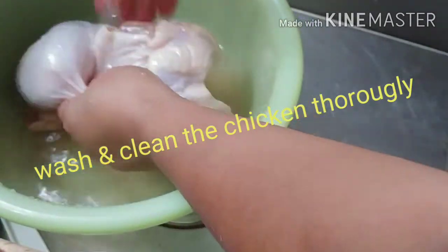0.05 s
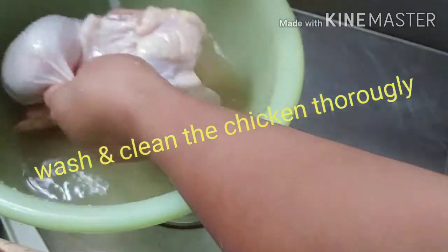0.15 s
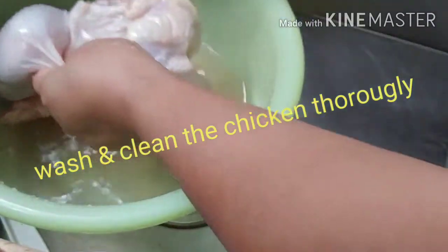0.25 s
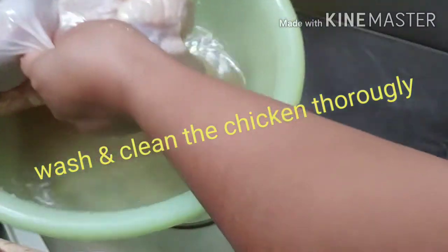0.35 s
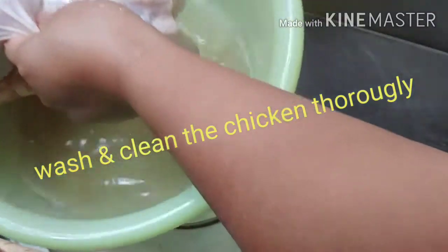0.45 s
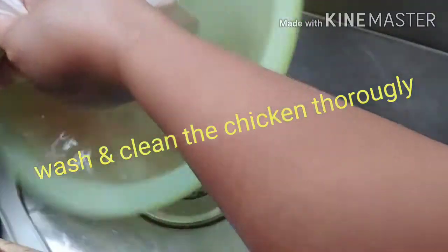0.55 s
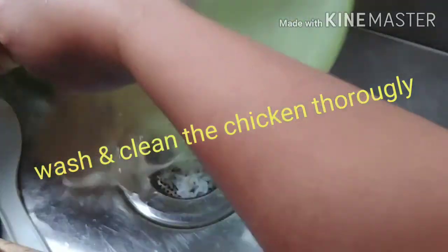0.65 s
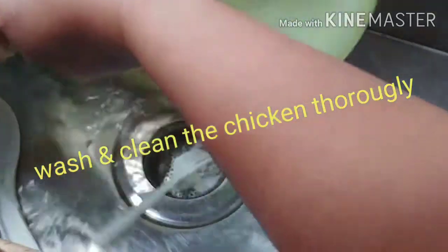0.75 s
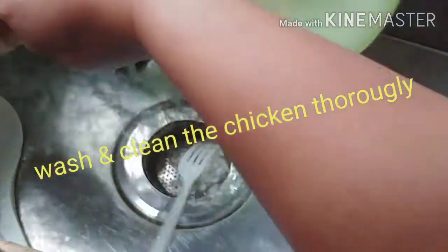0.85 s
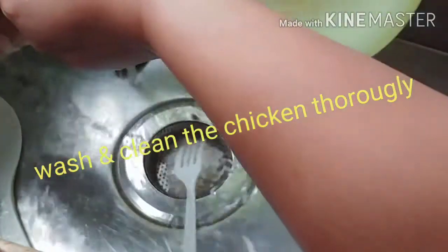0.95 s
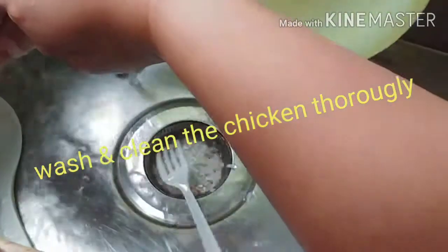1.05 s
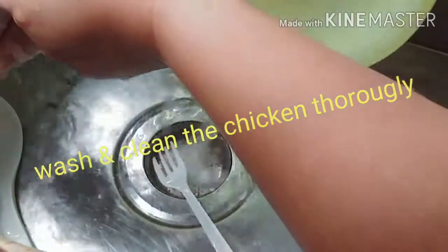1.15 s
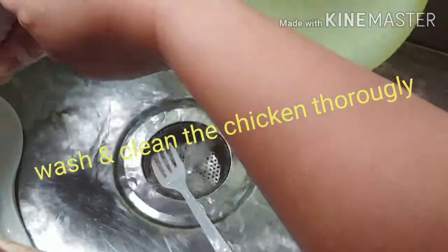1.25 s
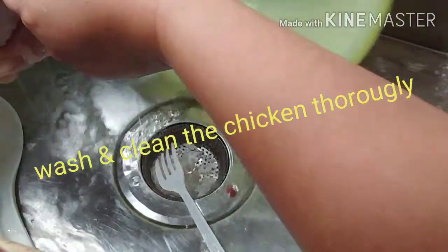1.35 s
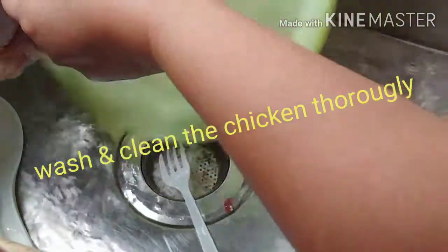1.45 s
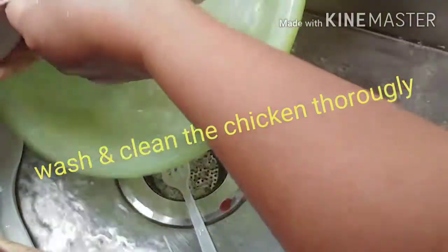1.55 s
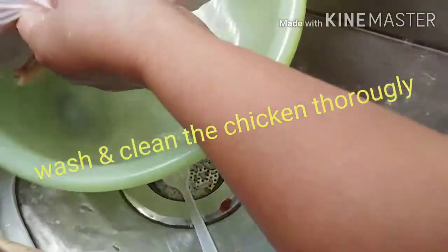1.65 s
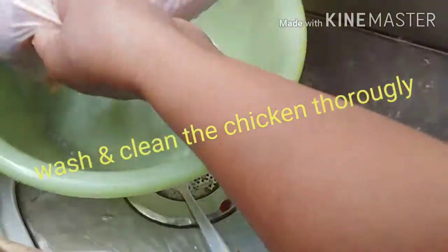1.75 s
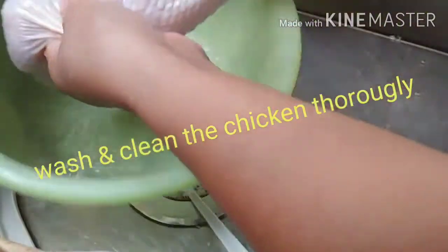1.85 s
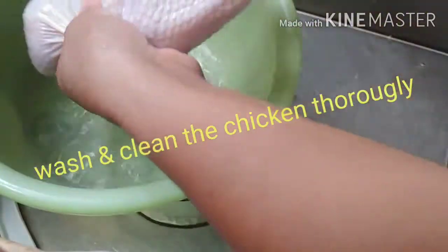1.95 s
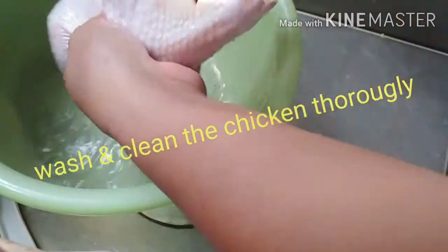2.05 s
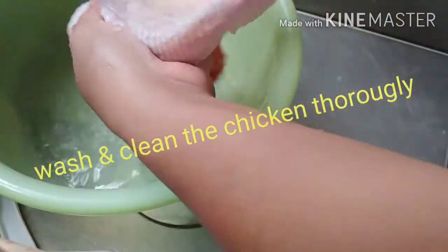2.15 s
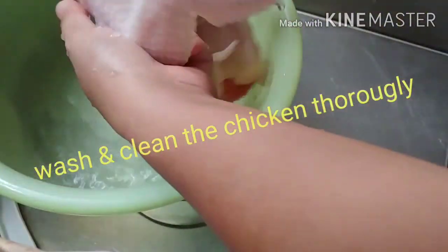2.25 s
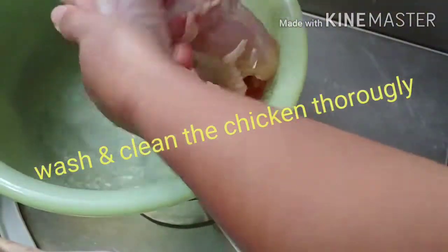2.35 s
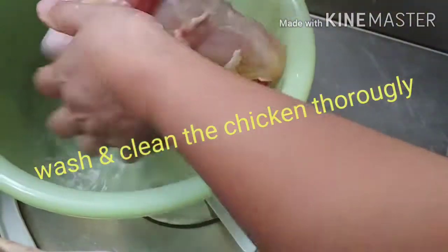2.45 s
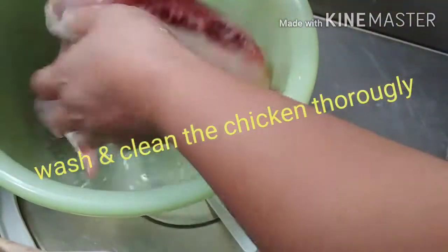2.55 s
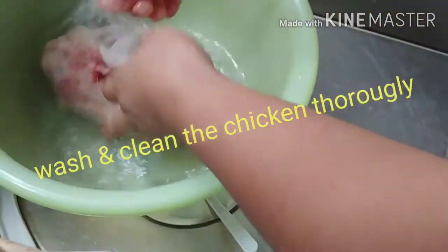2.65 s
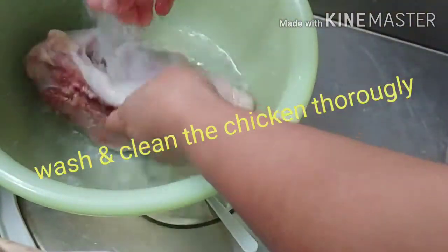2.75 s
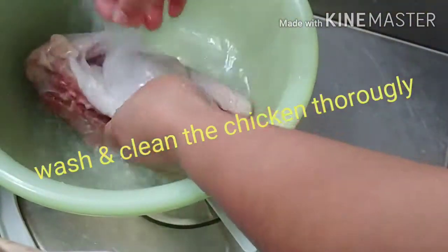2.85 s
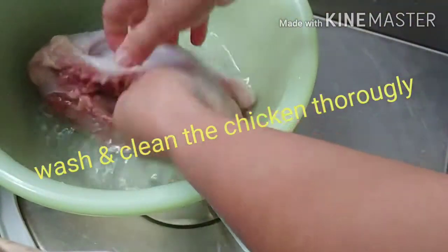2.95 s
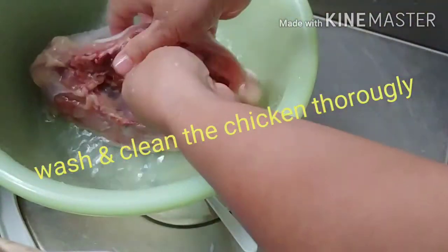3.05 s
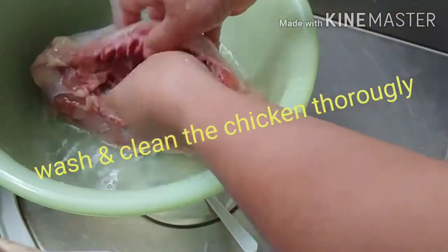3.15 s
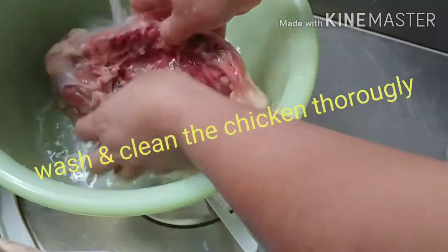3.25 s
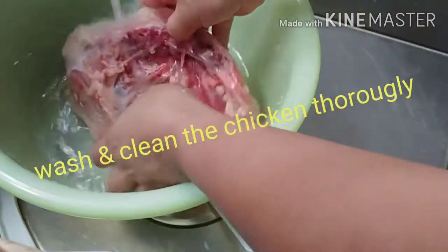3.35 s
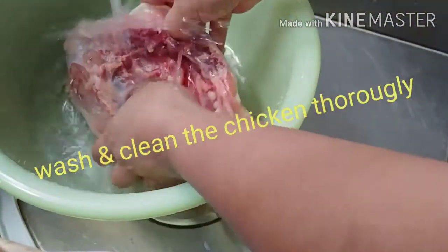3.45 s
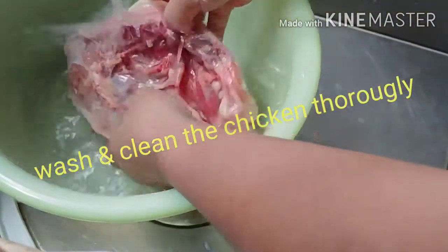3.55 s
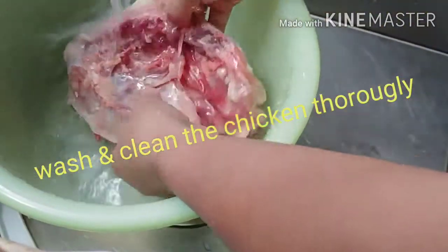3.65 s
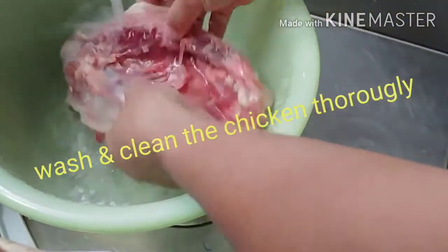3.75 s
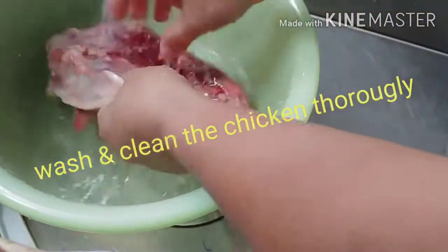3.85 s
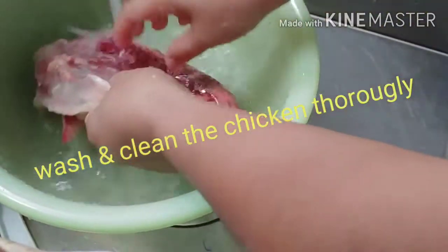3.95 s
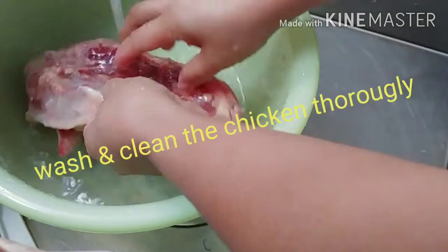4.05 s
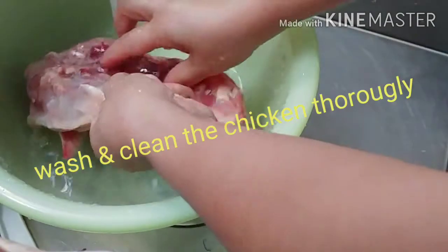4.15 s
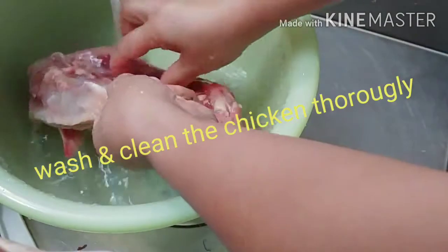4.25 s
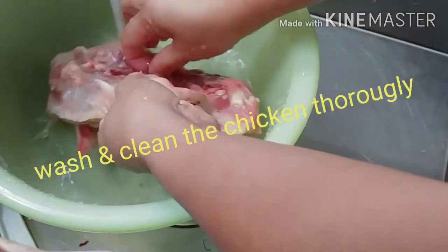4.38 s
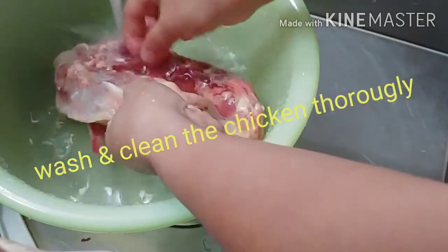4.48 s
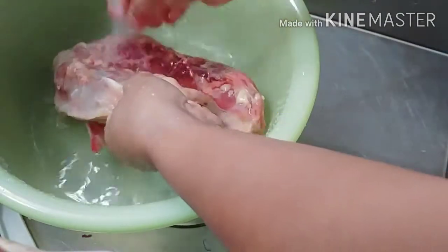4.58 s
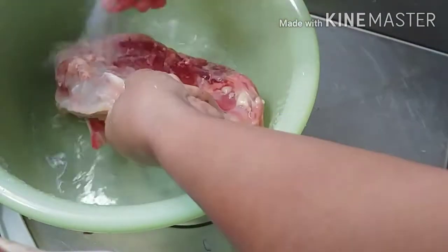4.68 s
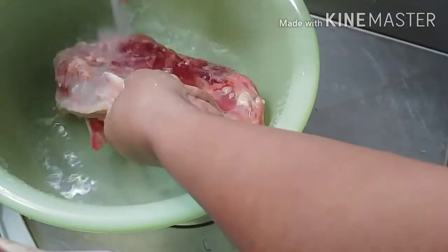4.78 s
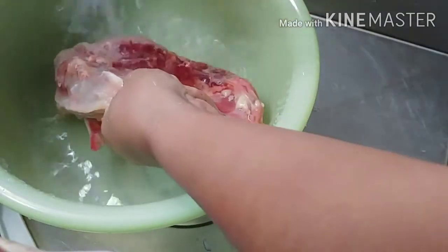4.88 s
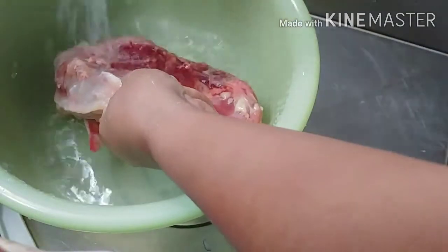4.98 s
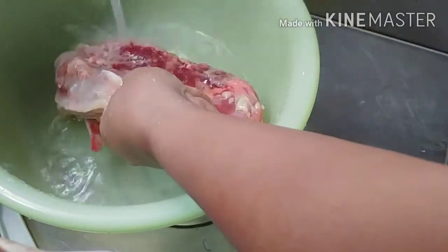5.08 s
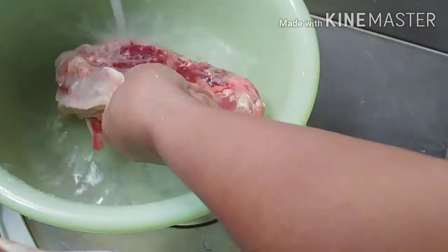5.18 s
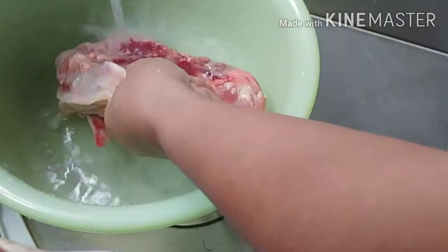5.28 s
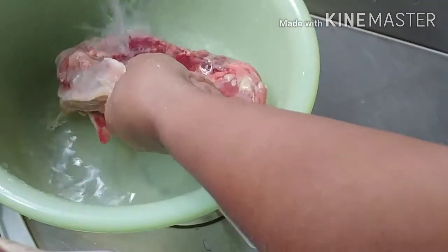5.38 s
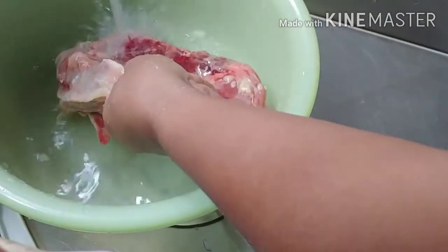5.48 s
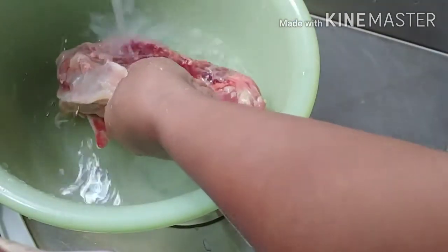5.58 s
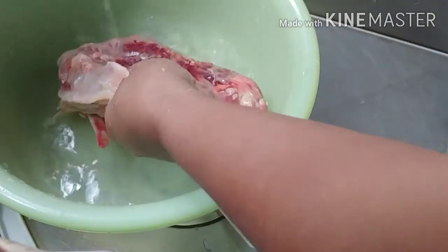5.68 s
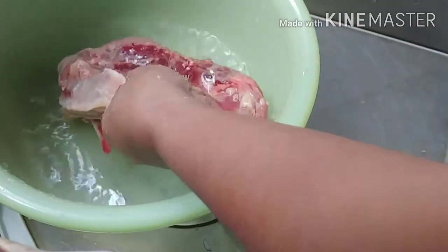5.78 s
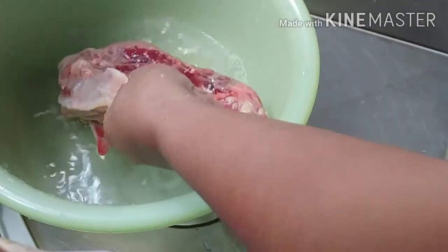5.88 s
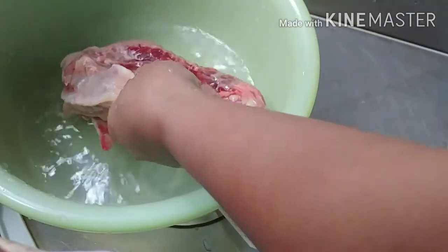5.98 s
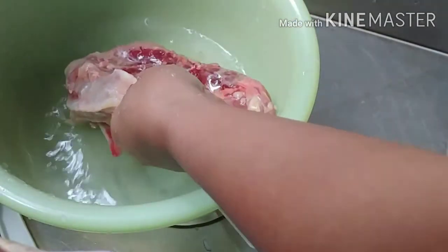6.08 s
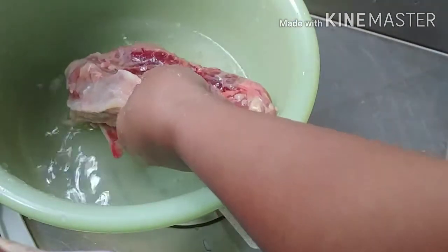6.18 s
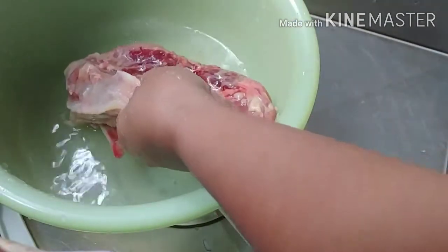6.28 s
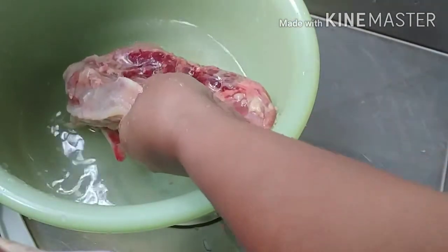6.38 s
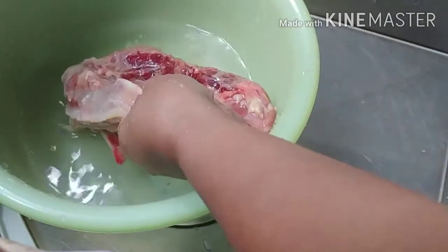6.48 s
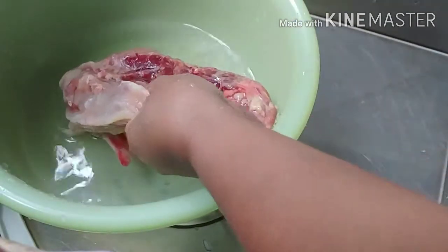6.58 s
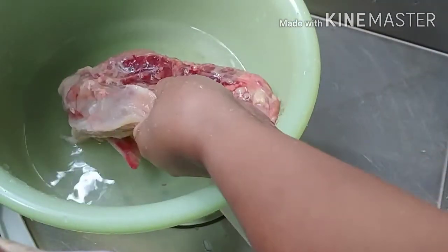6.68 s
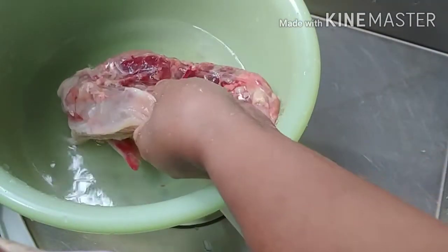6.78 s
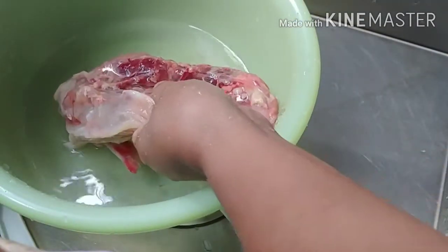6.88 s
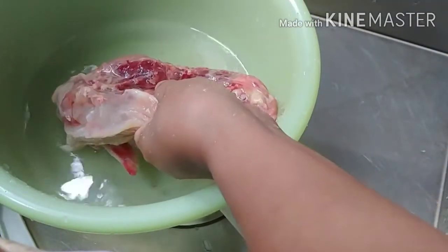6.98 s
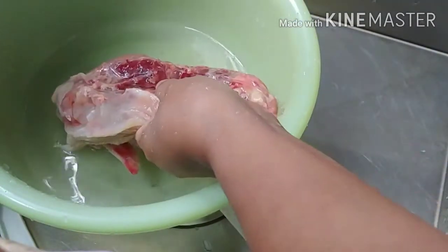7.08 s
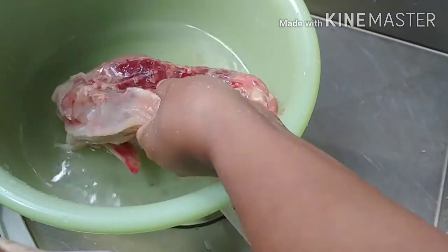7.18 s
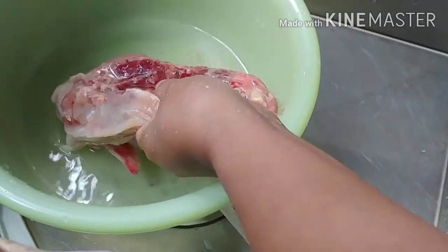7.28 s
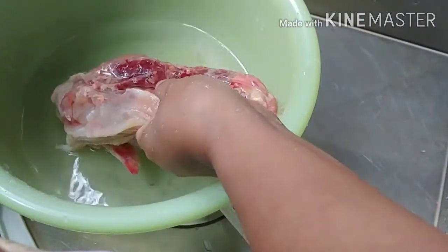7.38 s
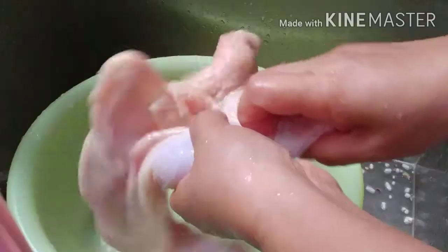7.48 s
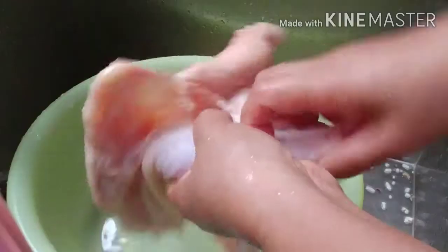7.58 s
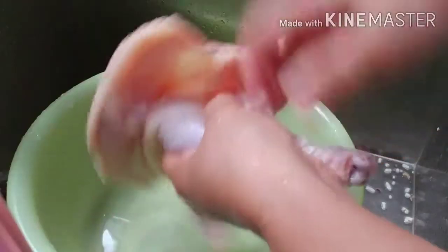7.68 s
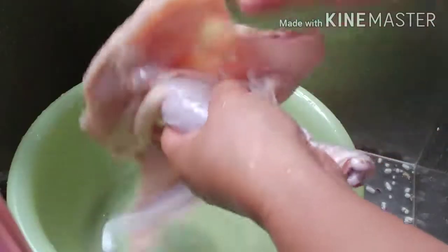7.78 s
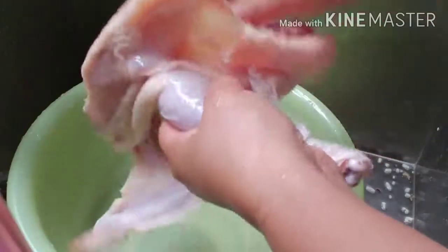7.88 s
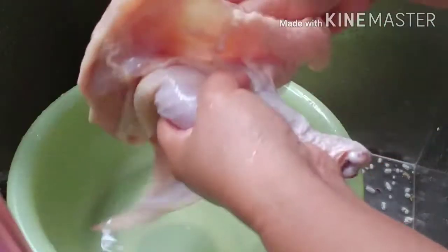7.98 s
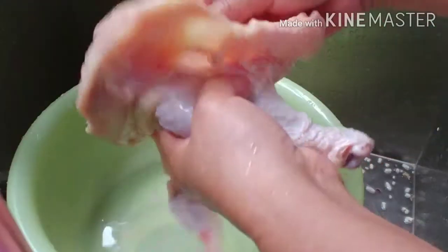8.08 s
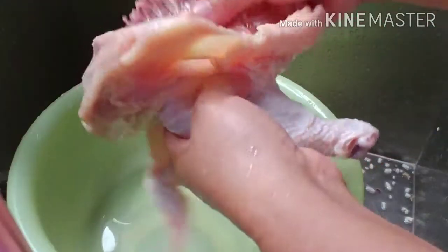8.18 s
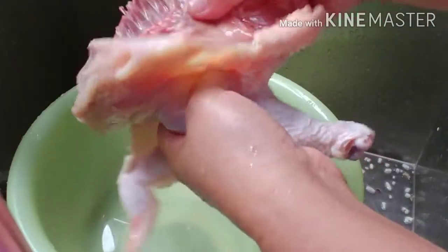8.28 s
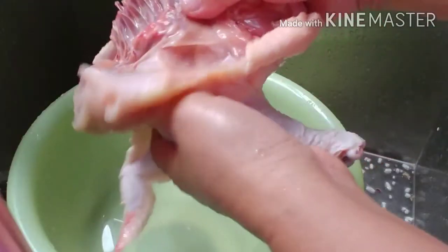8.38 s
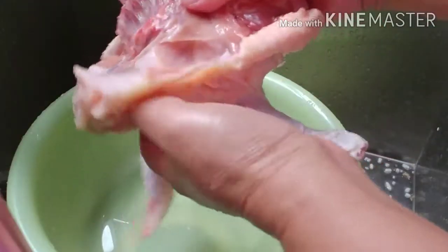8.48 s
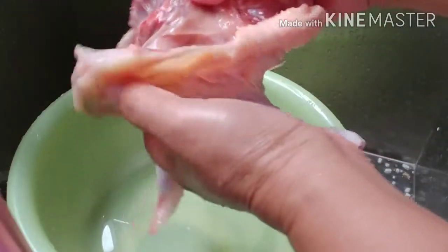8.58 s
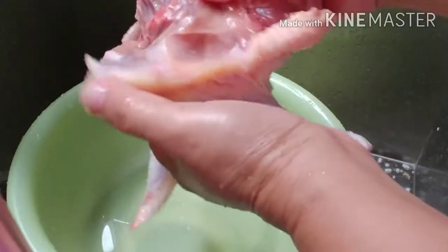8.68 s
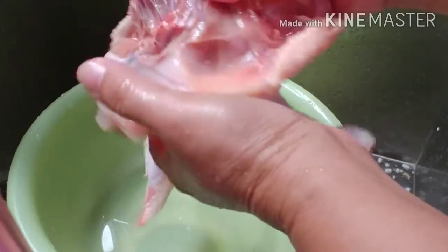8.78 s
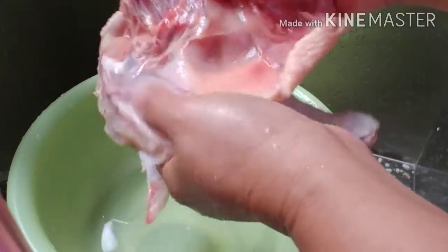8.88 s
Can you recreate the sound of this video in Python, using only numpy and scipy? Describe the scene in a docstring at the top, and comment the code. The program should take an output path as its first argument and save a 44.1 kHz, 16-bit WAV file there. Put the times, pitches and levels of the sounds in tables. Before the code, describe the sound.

Tap water splashes over meat into a plastic basin with bumps and clinks, then shuts off and drips.

```python
"""Tap water splashes over meat and hands into a plastic basin that stands in a steel sink.
Early on the basin is tipped out and bumps the sink, steel clinks, and run-off drums on the basin floor.
At 5.4 s the tap closes and spits once more; water goes on dripping onto the basin.
At 7 s the sound is cut to silence. Half a second later it returns as a quiet kitchen with soft drips."""
import sys
import numpy as np
from scipy import signal
from scipy.io import wavfile

SR = 44100
rng = np.random.default_rng(int(sys.argv[2]) if len(sys.argv) > 2 else 0)


def dump_mix(stems):
    """Bounce the given channels to the path in sys.argv[1] as a 16-bit WAV at rate SR."""
    frames = np.atleast_2d(stems).T  # one column per channel
    limited = np.clip(frames, -1, 1)  # hard clip at full scale
    pcm = np.round(limited * 32767).astype(np.int16)
    wavfile.write(sys.argv[1], SR, pcm)


N = 393794
CUT_S, BACK_S = 7.024, 7.584   # silence between these moments


def from_db(db):
    """Turn decibels into a number to multiply by."""
    return 10 ** (np.asarray(db) / 20)


def rms_one(x):
    """Scale a signal so that its average power is 1."""
    return x / np.sqrt(np.mean(x ** 2) + 1e-20)


def in_time(rows):
    """Join a table's rows with straight lines: one curve for each column after the time."""
    s, *columns = np.transpose(rows)
    return [np.interp(np.arange(N) / SR, s, c) for c in columns]


def at_hz(points, hz):
    """Read a table at any pitch, with octaves evenly spaced."""
    pitches, values = np.transpose(points)
    return np.interp(np.log(hz), np.log(pitches), values)


def drift(rate_hz):
    """A smooth random wobble, about 1 in size."""
    r = np.exp(-40 * np.pi * rate_hz / SR)   # worked out for every 20th sample
    slow = signal.lfilter([1], [1, -2 * r, r * r], rng.standard_normal(N // 20 + 3002))[3000:]
    return np.interp(np.arange(N) / 20, np.arange(len(slow)), rms_one(slow))


def soften(force, hz):
    """Dull the treble above hz, as when water lands softly."""
    r = np.exp(-2 * np.pi * hz / SR)
    return signal.lfilter([(1 - r) ** 2], [1, -2 * r, r * r], force + 1e-18)


def above(x, hz):
    """Cut the bass below hz: a small panel gives off little below its lowest note."""
    return signal.sosfilt(signal.butter(3, hz, "high", fs=SR, output="sos"), x)


def resonate(x, hz, width_hz):
    """Make a signal ring at one pitch; a smaller width rings longer."""
    r, w = np.exp(-np.pi * width_hz / SR), 2 * np.pi * hz / SR
    return signal.lfilter([0, np.sin(w)], [1, -2 * r * np.cos(w), r * r], x + 1e-18)


# How alike the two sides sound. Each row: pitch in Hz, likeness from 0 to 1.
LIKENESS = [(60, .95), (130, .98), (290, .9), (640, .5), (1400, .15), (3000, 0), (15000, 0)]
# Balance. Each row: pitch in Hz, level of the left side over the right in dB.
LEFT_OVER_RIGHT = [(60, -6), (200, -6), (600, -15.5), (1300, -9), (2400, -2), (4400, -4), (6500, -0.5),
                   (8000, -9), (12000, -4)]
def place(mid, side, hz):
    """Two microphone openings hear a band alike in the bass and unrelated in the treble."""
    alike, tilt = at_hz(LIKENESS, hz), at_hz(LEFT_OVER_RIGHT, hz) / 2
    pair = np.sqrt(1 + alike) * mid + np.sqrt(1 - alike) * side * [[1], [-1]]
    return pair * from_db([[tilt], [-tilt]])


def body(notes, force):
    """Two force signals ring all the notes of one object, swapping places from note to note."""
    return sum(from_db(db) * place(*resonate(force[::(-1) ** k], hz, width), hz)
               for k, (hz, width, db) in enumerate(notes))


def coloured(spectrum, sources, flicker_db, flicker_hz, bands, tilt_db=0):
    """Shape noise band by band, each with its own level and flicker; the sources take turns."""
    out, edges = 0, np.geomspace(spectrum[0][0], spectrum[-1][0], bands + 1)
    for k, (low, high) in enumerate(zip(edges, edges[1:])):
        band_filter = signal.butter(2, [low, high], "band", fs=SR, output="sos")
        band = signal.sosfilt(band_filter, sources[k % len(sources)])
        hz = np.sqrt(low * high)
        flicker = flicker_db * (drift(flicker_hz) + .7 * drift(flicker_hz / 8))
        level_db = at_hz(spectrum, hz) + flicker + tilt_db * np.log2(hz / 5000)
        out = out + from_db(level_db) * place(*band, hz)
    return rms_one(out)


def drops(per_s, spread_db):
    """Hits of uneven strength at random moments."""
    return (rng.random(N) < per_s / SR) * from_db(spread_db * np.minimum(rng.exponential(1, N), 4))


def bursts(per_s, spread_db, fade_s, steady):
    """Noise that flares each time a droplet lands, on top of a steady share."""
    r = np.exp(-1 / (fade_s * SR))
    flare = rms_one(signal.lfilter([1], [1, -r], drops(per_s, spread_db)))
    return rng.standard_normal((2, N)) * (steady + flare)


def flashes(table, width_share):
    """Each row is a flash of noise around one pitch that starts at once and fades."""
    out, t = np.zeros((2, N + 3000)), np.arange(3000) / SR
    for s, db, hz, fade_s in table:
        ring = resonate(rng.standard_normal((2, 3000)), hz, width_share * hz)
        flash = rms_one(above(ring, hz / 2)) * np.exp(-t / fade_s)
        at = round(s * SR)
        out[:, at:at + 3000] += from_db(db - 7) * place(*flash, hz)
    return out[:, :N]


def swells(table, attack_s=0.0028, fade_db_per_s=153.5):
    """Power of events that rise, hold and fade: one curve for each level column."""
    t, power = np.arange(0, N + 64, 64) / SR, 0
    for s, hold_s, *levels_db in table:
        rise = np.clip((t - s) / attack_s, 0, 1)
        fade_db = fade_db_per_s * np.maximum(t - s - attack_s - hold_s, 0)
        power = power + (rise * from_db(np.reshape(levels_db, (-1, 1)) - fade_db)) ** 2
    return [np.interp(np.arange(N) / SR, t, row) for row in power]


def joined(steady_db, power):
    """Level of a steady flow with swells on top, in dB."""
    return 10 * np.log10(from_db(steady_db) ** 2 + power)


def hiss():
    """The room and the microphone hiss faintly and steadily."""
    return from_db(-72) * soften(rng.standard_normal((2, N)), hz=14000)


# Loudness of the room air. Each row: time in seconds, level in dB.
AIR_LEVEL = [(7.58, -61.5), (7.9, -62), (8.02, -65.5), (8.93, -70)]
# Tone of the room air. Each row: pitch in Hz, relative level in dB.
AIR_COLOUR = [(35, -38), (60, -8), (189, -2), (236, -12), (389, 0), (459, -12), (543, -6), (730, -15),
              (5000, -28), (6500, -58), (11000, -120)]
def kitchen():
    """The air of the quiet kitchen makes a low rush."""
    air = coloured(AIR_COLOUR, rng.standard_normal((2, 2, N)), flicker_db=2.5, flicker_hz=15, bands=8)
    return from_db(in_time(AIR_LEVEL)[0]) * air


# Lone drips. Each row: start in seconds, relative level in dB, pitch in Hz, fade in seconds.
DRIPS = [(8.308, -52.5, 1490, 0.0079), (8.436, -58, 3060, 0.018), (8.625, -53.5, 8450, 0.011),
         (8.918, -59.5, 1250, .008)]
def drips():
    """A few small drips land in the quiet kitchen."""
    return flashes(DRIPS, width_share=0.055)


# Small drops. Each row: start in seconds, relative level in dB, pitch in Hz, fade in seconds.
TICKS = [(5.912, -47, 7940, 0.003), (5.9, -51, 2800, 0.011), (5.94, -55, 2830, 0.014),
         (6.0117, -50, 7840, .004), (6.03, -56, 2850, .01), (6.1285, -55, 2870, 0.0093),
         (6.142, -51, 2480, 0.0089), (6.158, -53, 2850, 0.011), (6.208, -56, 2810, 0.0093),
         (6.245, -50.5, 2800, 0.016), (6.368, -55, 4600, .004), (6.488, -48, 2820, 0.012),
         (6.5, -53, 2490, .02), (6.559, -60, 2850, 0.007), (6.59, -55, 2860, .01),
         (6.6628, -50, 3380, 0.007), (6.662, -56, 4000, .004), (6.672, -62, 8100, 0.0067),
         (6.686, -50, 2840, 0.019), (6.73, -57.5, 2880, .008), (6.781, -60, 8150, 0.009),
         (6.782, -54, 4030, 0.0042), (6.783, -61, 6700, .008), (6.8234, -60, 8100, .006),
         (6.862, -58, 2850, .012), (6.8882, -48, 2820, .01), (6.889, -53, 4020, 0.0052),
         (6.93, -59, 2850, 0.012), (6.9701, -58, 8040, 0.011), (6.997, -54.5, 8300, .012)]
def ticks():
    """Drops tick on the water and the rim after the tap closes."""
    return flashes(TICKS, width_share=0.022)


# Sloshes. Each row: start and hold in seconds, then gurgle, basin floor, wall and sink levels in dB.
SLOSHES = [(-0.01, 0.012, -39, -19.5, -42.5, -11.5), (0.189, 0.017, -13, -19, -32, -15.5),
           (0.352, 0.02, -14, -21, -22.5, -43.5), (0.523, 0.034, -28.5, -45, -33.5, -20.5),
           (1.152, 0.15, -21, -20, -33.5, -24), (1.362, 0.03, -23, -22.5, -32.5, -25.5),
           (1.403, 0.2, -20.5, -21.5, -31, -17.5), (2.027, 0.064, -33.5, -30, -26, -29.5),
           (2.284, 0.048, -29, -24, -53.5, -36.5), (2.966, 0.34, -36, -36, -49, -41.5),
           (3.701, 0.3, -31.5, -41, -43.5, -64), (4.95, 0.013, -40, -32, -41, -41),
           (8.394, 0.025, -89.5, -63, -84.5, -46.5)]
def sloshes():
    """Water tipped in a mass swells the power of the gurgle, basin floor, wall and sink."""
    return swells(SLOSHES)


# Notes of the basin's floor (with its bowl of air), wall and rim, and of the steel sink.
# Each row: pitch in Hz, width in Hz, relative level in dB.
FLOOR_NOTES = [(152.6, 7.5, -13.5), (212.8, 28, 2), (240, 55, -5), (294, 52, -2.5), (346, 21, -13.5)]
WALL_NOTES = [(445, 35, -9), (505, 30, -12), (550, 24, 2), (640, 30, -8), (672, 30, -12)]
RIM_NOTES = [(863, 64, -11), (952, 28, -3), (1049, 56, -5.5), (1436, 26, -7.5), (1600, 45, -11),
             (1750, 45, -14), (2470, 70, -22), (2850, 65, -20), (3300, 120, -25), (4100, 140, -24)]
SINK_NOTES = [(61.7, 14, -24), (91.3, 19, 7.5), (120, 23, 8)]
# Steady drumming. Each row: time in seconds, then basin floor, wall and sink levels in dB.
RUN_OFF = [(0.0, -42, -40, -28), (0.6, -37.5, -50, -28), (1.0, -33, -46, -48), (1.35, -37, -43, -29),
           (1.75, -40.5, -35, -37.5), (2.2, -32, -36, -37), (2.6, -38.5, -53, -50),
           (3.6, -40.5, -48.5, -46.5), (4.15, -43, -41, -48), (4.6, -25, -46, -46),
           (4.9, -26.5, -40.5, -49), (5.2, -29, -44, -37), (5.5, -30.5, -39.5, -48), (5.8, -34.5, -45, -41),
           (6.2, -36.5, -51.5, -44.5), (6.41, -45.5, -56.5, -47), (6.55, -36, -52, -45),
           (6.74, -47.5, -58, -46.5), (6.86, -35, -52.5, -46.5), (7.02, -33.5, -49.5, -38),
           (7.62, -77.5, -100, -78.5), (7.76, -63.5, -70, -69.5), (7.94, -66, -80.5, -69),
           (8.05, -91.5, -99, -84.5), (8.34, -67.5, -83, -70), (8.5, -65.5, -86.5, -76),
           (8.93, -78, -89, -68)]
def run_off(slosh_powers):
    """Streams of drops drum on the basin; the sink under it booms along."""
    floor_db, wall_db, sink_db = map(joined, in_time(RUN_OFF), slosh_powers)
    patter = soften(drops(220, spread_db=2.0) * rng.standard_normal((2, N)), hz=1514)
    boom = soften(drops(330, spread_db=-2.2) * rng.standard_normal((2, N)), hz=200.7)
    floor = rms_one(above(body(FLOOR_NOTES, soften(patter, hz=510)), hz=114))
    wall = rms_one(above(body(WALL_NOTES, patter) + from_db(3.0) * body(RIM_NOTES, patter), hz=398))
    sink = rms_one(body(SINK_NOTES, boom))
    return from_db(floor_db) * floor + from_db(wall_db) * wall + from_db(sink_db) * sink


# Blows on the basin. Each row: start in seconds, then relative floor, wall and rim strengths in dB.
KNOCKS = [(0.151, 11, -14.5, -14), (0.185, 9.5, -21, -15), (0.214, -1, -26, -8), (0.361, -26, -17, -25),
          (0.511, 3, -10, -17), (0.529, 4, -20, -30), (0.681, -14, -39, -42), (1.149, 3.5, -15, -15),
          (1.212, 10, -5, -18), (1.282, -6, -19, -24), (1.341, -2, -16, -38), (1.408, 5.5, -13, -20),
          (1.479, -4, -18, -16), (1.509, 1.5, -12, -9), (1.545, -4, -23, -15), (1.58, -5, -23, -10),
          (1.701, -28, -59, -22), (2.037, -12, -30, -28), (2.312, -9, -31, -18), (2.518, -11.5, -39, -43),
          (2.989, -11, -22, -34), (3.683, -20, -38.5, -24), (3.836, -16, -25, -25), (4.011, -17, -24, -26),
          (4.335, -10, -25, -39), (4.412, -12, -29, -41), (4.535, -8, -64, -32), (4.573, -5, -33, -32),
          (4.666, -5, -45, -26), (4.751, 1, -36, -35), (4.809, 1, -32, -36), (4.958, 0, -53, -33),
          (5.007, -1, -40, -37), (5.057, -0.5, -47, -39), (5.139, -3, -28, -52), (5.181, -10, -37, -53),
          (5.366, -39, -25, -23), (5.398, -46, -26, -26), (5.46, -2.5, -44, -56), (5.485, -8, -28, -37),
          (5.521, -16, -30, -44), (5.533, -2, -27, -31), (5.573, -9, -27, -45), (5.616, -11, -25.5, -59),
          (5.655, -12, -29, -61), (5.796, -9.5, -23, -50), (5.881, -19, -39.5, -59),
          (5.891, -16.5, -28, -49), (5.901, -8.5, -39, -55), (5.936, -16, -27, -35),
          (5.944, -3.5, -16.5, -32), (5.971, -22.5, -32, -55), (6.009, -5, -25, -49),
          (6.034, -16, -39, -55), (6.071, -8, -32, -61), (6.092, -9, -27, -60), (6.129, -14, -25, -39.5),
          (6.158, -13.5, -37, -57), (6.207, -28, -31, -66), (6.245, -7.5, -22.5, -58),
          (6.271, -10.5, -26, -55), (6.297, -32, -36, -48), (6.324, -16, -32, -38),
          (6.368, -17.5, -41, -46), (6.441, -40, -48, -71), (6.485, -6.5, -25.5, -45),
          (6.574, -18, -37, -58), (6.592, -11, -36, -49), (6.612, -15, -22, -44), (6.656, -11, -25, -42.5),
          (6.683, -18.5, -25, -47), (6.784, -17, -38, -55), (6.818, -11, -25, -65),
          (6.873, -11.5, -25, -48), (6.927, -14, -21, -63), (6.965, -22, -39.5, -60.5),
          (6.996, -13.5, -28, -55), (7.886, -46.5, -70, -71.5), (8.431, -34.5, -65, -72),
          (8.607, -29, -66, -68.5)]
def knocks():
    """Bumps and heavy drops each land three times within 30 ms and ring the basin's notes unevenly."""
    s, floor_db, wall_db, rim_db = np.transpose(KNOCKS)
    at, out = np.round(s * SR).astype(int), 0
    delays_s = rng.uniform(.004, .03, (len(at), 2)).T
    bounces = np.minimum(at + (delays_s * SR).astype(int), N - 1)
    sink_db = np.where(s < 2.6, floor_db - 27, -200)   # the sink thumps while the basin is moved about
    parts = ((FLOOR_NOTES, floor_db - 17, 220, 120), (WALL_NOTES, wall_db - 5.5, 160, 380),
             (RIM_NOTES, rim_db, 160, 800), (SINK_NOTES, sink_db, 150, 60))
    for notes, level_db, contact_hz, low_hz in parts:
        ring = 0
        for hz, width, db in notes:
            force = np.zeros((2, N))
            luck = rng.normal(0, 1, (len(at), 4)).T
            force[:, at] = from_db(level_db + db + (1.2 + hz / 1300) * luck[:2])
            for again, share in zip(bounces, luck[2:]):
                force[:, again] += 0.28 * force[:, at] * np.clip(share, -1.5, 1.5)
            soft_push = 2 * np.pi * contact_hz / SR * resonate(force, hz, contact_hz)
            ring = ring + place(*resonate(soft_push, hz, width), hz)
        out = out + above(ring, hz=low_hz)
    return out


# Notes of the struck steel. Each row: pitch in Hz, width in Hz, relative level in dB.
STEEL_NOTES = [(948, 50, -6), (1250, 90, -5), (1566, 80, -1), (1930, 90, -3), (2363, 60, -1),
               (2600, 60, -2), (2850, 90, -5), (3200, 120, -8), (3887, 150, -11)]
# Clinks. Each row: start in seconds, relative strength in dB, fade of the rattle in seconds.
CLINKS = [(0.509, -1.5, 0.0048), (0.751, 2.5, 0.019), (0.771, -2.5, 0.014), (1.15, -0.5, .005),
          (1.21, 0, .005), (1.284, -8, .006), (1.409, 2, .004), (1.474, -2.5, 0.0044), (1.51, 1, .007),
          (1.545, -6, .006), (1.58, -5, 0.0061), (5.369, -15.5, 0.0055), (5.396, -6, 0.0056)]
def clinks():
    """A fork or the rim rattles briefly against steel and makes it ring."""
    force, t = np.zeros((2, N + 2000)), np.arange(2000) / SR
    for s, db, fade_s in CLINKS:
        rattle = rng.standard_normal((2, 2000)) * np.exp(-t / fade_s)
        at = round(s * SR)
        force[:, at:at + 2000] += from_db(db - 40) * rattle
    return above(body(STEEL_NOTES, force[:, :N]), hz=850)


# Air pockets. Each row: start in seconds, relative level in dB, first pitch in Hz,
# rise in Hz per second, fade in seconds.
POPS = [(0.751, -14, 1200, 70000, 0.008), (0.768, -17, 1900, 35000, 0.012)]
def pops():
    """A shrinking pocket of trapped air rings at a rough, climbing pitch."""
    out, t = np.zeros((2, N)), np.arange(4000) / SR
    for s, db, hz, rise_hz_per_s, fade_s in POPS:
        tone = np.sin(2 * np.pi * (hz * t + rise_hz_per_s * t ** 2 / 2))
        roughness = .5 + rms_one(soften(rng.standard_normal((2, 4000)), hz=350))
        shape = np.minimum(t / 0.0029, 1) * np.exp(-t / fade_s)
        mid, side = tone * roughness * shape
        at = round(s * SR)
        out[:, at:at + 4000] += from_db(db) * place(mid, side * .5, hz)
    return out


# Notes of the hollow in the meat. Each row: pitch in Hz, width in Hz, relative level in dB.
CAVITY_NOTES = [(651, 47, 0), (894, 60, -8)]
def cavity(start_s=3.71, hold_s=0.29, level_db=-25):
    """Water runs once into the hollow of the meat and rings the air inside."""
    power, = swells([(start_s, hold_s, level_db)])
    inflow = bursts(97, spread_db=10.5, fade_s=0.019, steady=0.48)
    return np.sqrt(power) * rms_one(body(CAVITY_NOTES, inflow))


# Hits on folds. Each row: start and hold in seconds, level in dB, pitch in Hz, width in Hz.
FOLD_HITS = [(0.197, 0.027, -30.5, 4450, 500), (0.54, 0.25, -32.5, 4370, 200),
             (0.657, 0.024, -31, 3060, 250), (2.27, 0.087, -31, 4760, 500), (2.63, 0.09, -34.5, 6000, 400),
             (3.0, 0.16, -38, 4930, 400), (3.294, 0.038, -33, 3630, 500), (3.43, 0.23, -33.5, 5920, 500),
             (3.696, 0.06, -29.5, 5070, 600), (3.73, 0.031, -33.5, 3240, 500), (3.978, .2, -32, 5860, 500),
             (4.207, 0.033, -26, 5640, 500), (4.287, 0.023, -32, 3200, 500), (4.378, .05, -33, 4500, 400)]
def fold_hits():
    """The jet hits a fold or an edge, and one pitch of the spray stands out for a while."""
    out, noise = np.zeros((2, N)), bursts(200, spread_db=6.5, fade_s=0.0011, steady=1.5)
    for s, hold_s, db, hz, width in FOLD_HITS:
        start, end = round(s * SR), round((s + hold_s + .05) * SR)
        t = np.arange(end - start) / SR
        shape = np.minimum(t / .008, 1) * from_db(-600 * np.maximum(t - hold_s, 0))
        ring = resonate(resonate(noise[:, start:end], hz, width), hz, width)
        out[:, start:end] += from_db(db) * shape * place(*rms_one(ring), hz)
    return out


# Single splashes. Each row: start in seconds, relative level in dB, pitch in Hz.
SPLATS = [(0.19, -12.5, 7540), (0.357, -5, 4900), (0.703, -2, 7800), (0.718, -20, 4300), (2.29, -11, 7600),
          (2.3, -11, 4900), (2.62, -10, 2840), (2.962, -6.5, 5900), (3.4474, -6, 7450), (3.7065, -15, 7700),
          (4.031, -10.5, 3000), (4.12, -2, 5550), (4.2112, -5, 7440), (4.393, -13, 7800),
          (4.7218, -4, 6800), (5.009, -9, 8050), (5.045, -11, 5470), (5.083, -11.5, 3330),
          (5.094, -2.5, 5800), (5.115, -11.5, 5970), (5.152, -5.5, 8200), (5.189, -16, 6050),
          (5.254, -8.5, 8150), (5.2847, -6, 8050), (5.288, -8, 3600), (5.3537, -5, 8300),
          (5.367, -11, 4020), (5.395, -10, 5670), (5.396, -6, 3000), (5.404, -17, 3400),
          (5.5833, -39, 8100), (5.67, -31, 2200), (5.669, -33, 5000), (5.69, -28, 7700)]
def splats(fade_s=.003):
    """Sharp splashes jump out of the spray."""
    return flashes([(*row, fade_s) for row in SPLATS], width_share=0.17)


# Notes of the air over the pool and of the air column beside the jet.
# Each row: pitch in Hz, width in Hz, relative level in dB.
POOL_NOTES = [(467.3, 41, -1.5), (506, 250, -7.5), (643.5, 62, -1.5), (973, 110, 0), (1033, 120, 3.5),
              (1276, 180, 1.5), (1740, 300, 8), (2200, 330, 6.5)]
COLUMN_NOTES = [(1588, 98, 0)]
def gurgle(level_db, ring_db):
    """Lumps of water plop into the pool and ring its air; the air beside the jet rings too."""
    plops = soften(bursts(83, spread_db=4.5, fade_s=0.009, steady=1.0), hz=3200)
    pool = from_db(level_db) * rms_one(above(body(POOL_NOTES, plops), hz=371.7))
    column_gain = from_db(ring_db + 2.1 * drift(7.0))
    column = rms_one(above(body(COLUMN_NOTES, rng.standard_normal((2, N))), hz=1185))
    return pool + column_gain * column


# Tone of the spray. Each row: pitch in Hz, relative level in dB.
SPRAY_COLOUR = [(1800, -11), (2400, -7.5), (3000, -3.5), (4400, -6), (5900, -6), (6900, -11), (8000, -7.5),
                (8900, 4.5), (9600, -36), (10400, -46), (11200, -35.5), (12000, -16.5), (15600, -17)]
def spray(level_db, tilt_db):
    """Droplets burst on skin and water; three random streams make nearby bands sparkle separately."""
    per_s = 300 * from_db(0.87 * drift(30))
    streams = [bursts(per_s, spread_db=4.5, fade_s=0.0015, steady=2.5) for _ in range(3)]
    fizz = coloured(SPRAY_COLOUR, streams, flicker_db=2.0, flicker_hz=31, bands=16, tilt_db=tilt_db)
    return from_db(level_db) * above(fizz, hz=2450)


# The flow from the tap. Each row: time in seconds, then spray, gurgle and air column levels in dB,
# then the spray's brightness in dB per octave.
JET_FLOW = [(0.0, -17, -12, -34, 0.5), (0.05, -20, -31.5, -30.5, 2), (0.14, -20.5, -24, -41, 0.5),
            (0.27, -24, -23, -30, -2), (0.45, -19, -32.5, -38.5, -0.5), (0.66, -23, -36, -39, 2),
            (1.1, -24, -35.5, -39, 2), (1.6, -23, -38.5, -35, -1), (1.8, -20, -28.5, -36, 3.5),
            (2.2, -20.5, -33, -43.5, 1), (2.38, -25, -42, -41, -1), (2.55, -22, -38.5, -37, 0.5),
            (2.75, -22.5, -40, -43, 0.5), (3.0, -20.5, -42, -39.5, 5), (3.62, -20, -39, -40, 3),
            (3.9, -22.5, -35, -29.5, -0.5), (4.15, -22.5, -42.5, -42, 3), (4.36, -23, -40, -37.5, 4.5),
            (4.65, -23, -39.5, -38, 2.5), (4.8, -20.5, -40.5, -38, 3.5), (5.08, -35, -46, -39, 5),
            (5.33, -23.5, -46, -66.5, 6.5), (5.4, -22, -29.5, -54.5, -3.5), (5.46, -44, -50, -65, -3.5),
            (5.55, -65.5, -80.5, -69, 1.5), (5.664, -57, -68, -70, 1), (5.669, -49, -43, -60, -3),
            (5.71, -40.5, -31.5, -41, -3.5), (5.78, -48.5, -36, -51, -8), (5.89, -63, -71, -81, -0.5),
            (6.06, -67.5, -70, -81, -1), (6.42, -64.5, -66, -80, 0), (6.6, -71, -67, -76.5, -1),
            (7.02, -70, -70, -86, -6)]
# The jet bursts on a hand or bone. Each row: start in seconds, hold in seconds, spray level in dB.
SURGES = [(0.201, 0.023, -15), (0.28, 0.065, -20.5), (0.35, 0.041, -14), (0.483, 0.13, -18.5),
          (0.69, 0.12, -17.5), (0.915, 0.34, -21), (1.273, 0.052, -18), (1.403, 0.012, -16),
          (1.453, 0.026, -17), (1.733, 0.1, -21), (2.276, 0.04, -17), (2.42, 0.02, -25.5),
          (2.611, 0.042, -20), (2.767, 0.012, -26.5), (2.906, 0.06, -21), (3.189, 0.13, -22.5),
          (3.703, 0.088, -16.5), (3.973, 0.32, -21.5), (4.444, 0.074, -24.5), (4.684, 0.56, -20),
          (5.383, 0.0019, -29), (5.671, 0.014, -40), (5.687, 0.016, -27)]
def jet(slosh_power):
    """The tap's jet sprays off meat and hands and gurgles into the pool."""
    spray_db, gurgle_db, ring_db, tilt_db = in_time(JET_FLOW)
    surge, = swells(SURGES, attack_s=0.0022, fade_db_per_s=171.5)
    wavering_db = spray_db - 1.4 * drift(12)
    return spray(joined(wavering_db, surge), tilt_db) + gurgle(joined(gurgle_db, slosh_power), ring_db)


def scene():
    """Washing first, then the quiet kitchen; the basin and the hiss sound in both."""
    t = np.arange(N) / SR
    gurgle_power, *drum_powers = sloshes()
    washing = jet(gurgle_power) + cavity() + splats() + ticks() + fold_hits() + clinks() + pops()
    basin = knocks() + run_off(drum_powers)
    return hiss() + basin + (t < CUT_S) * washing + (t > BACK_S) * (kitchen() + drips())


# The band the microphone barely hears: its lower and upper edge in Hz.
DEAF_BAND_HZ = [10100, 11300]
def record(dry):
    """The microphone's opening rings in the treble and is deaf just above; bass and top are cut."""
    t = np.arange(N) / SR
    ring_hz, width_hz = 7922, 940
    lift = from_db(5) * 2 * np.pi * width_hz / SR
    heard = dry + lift * resonate(dry, ring_hz, width_hz)
    heard = signal.sosfilt(signal.butter(2, DEAF_BAND_HZ, "bandstop", fs=SR, output="sos"), heard)
    heard = signal.sosfilt(signal.butter(4, 48, "high", fs=SR, output="sos"), heard)
    heard = 1.1 * np.tanh(heard / 1.1)   # round off the loudest peaks
    heard *= (t < CUT_S) | (t > BACK_S)   # the silent gap
    return signal.sosfilt(signal.cheby2(14, 75, 16100, fs=SR, output="sos"), heard)


dry = scene()
out = record(dry)
dump_mix(out)
```